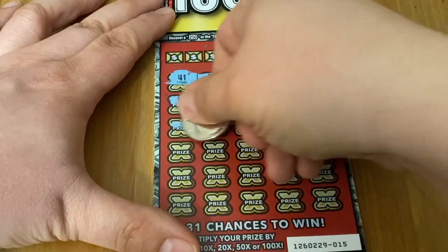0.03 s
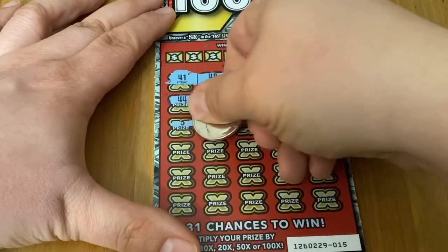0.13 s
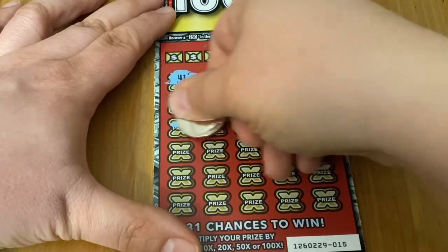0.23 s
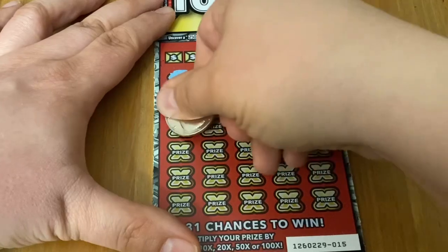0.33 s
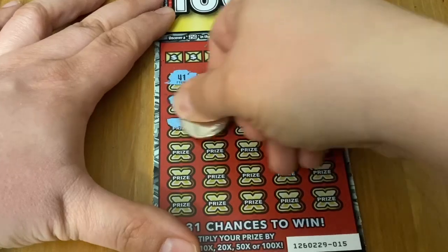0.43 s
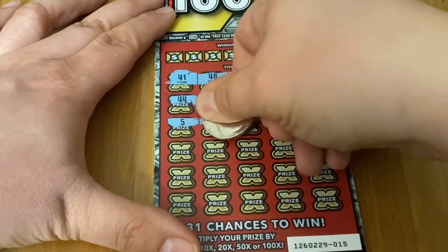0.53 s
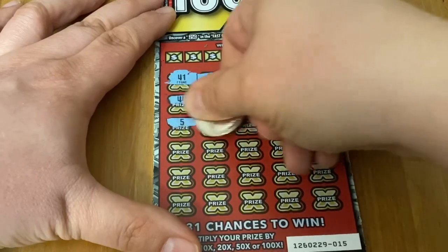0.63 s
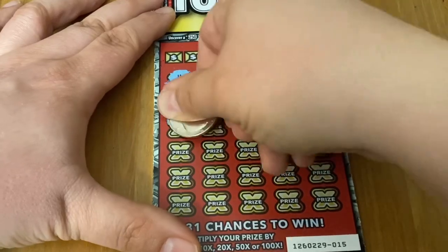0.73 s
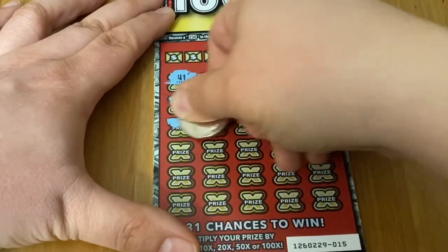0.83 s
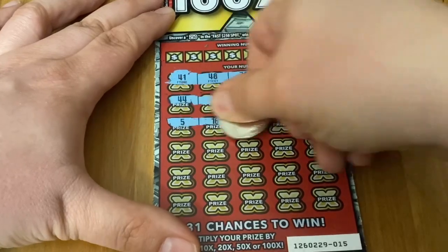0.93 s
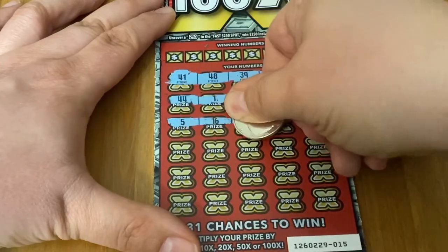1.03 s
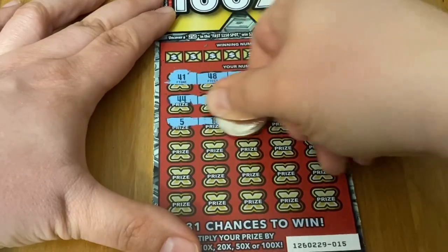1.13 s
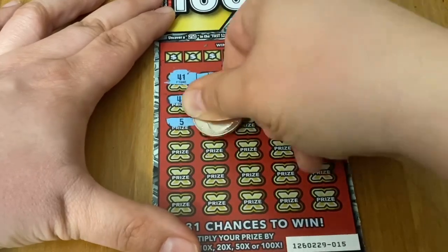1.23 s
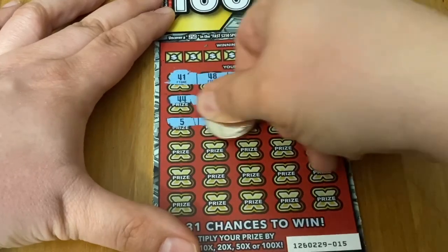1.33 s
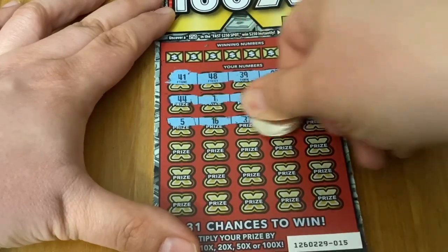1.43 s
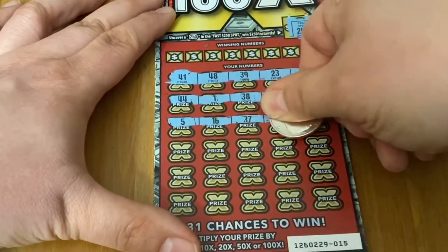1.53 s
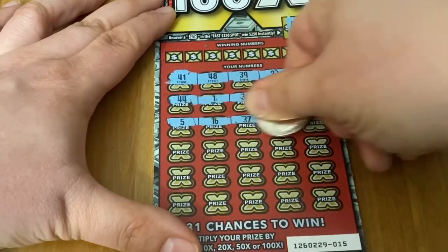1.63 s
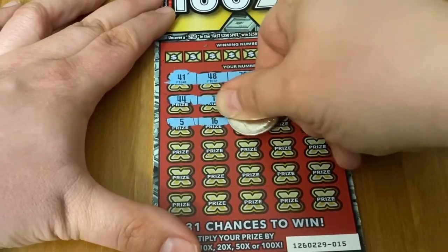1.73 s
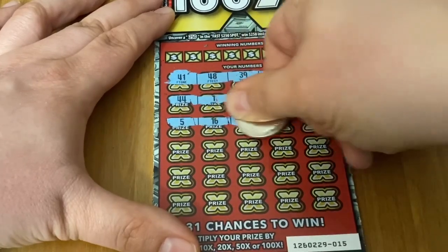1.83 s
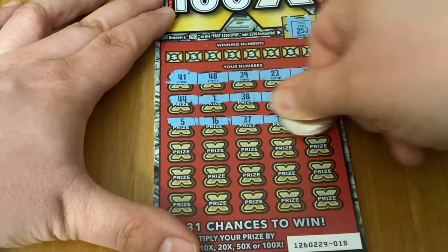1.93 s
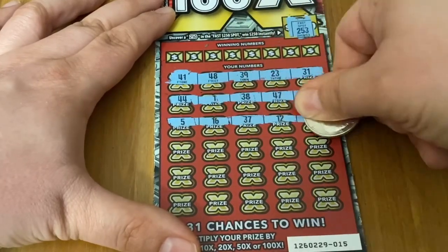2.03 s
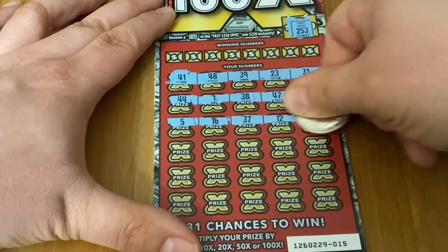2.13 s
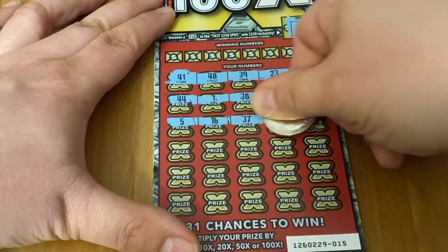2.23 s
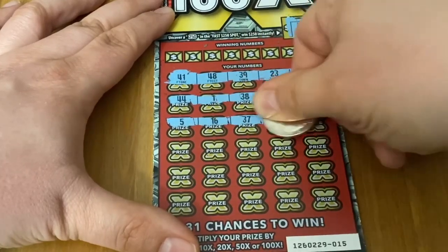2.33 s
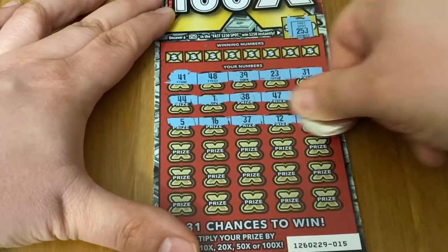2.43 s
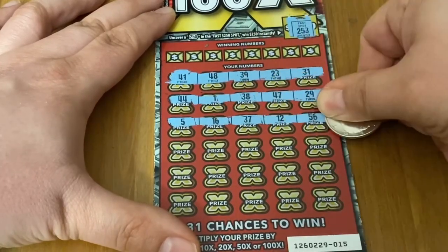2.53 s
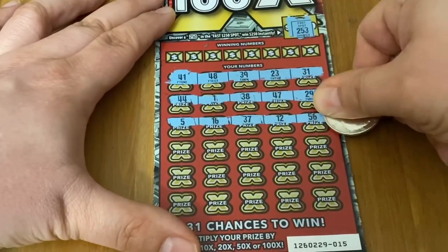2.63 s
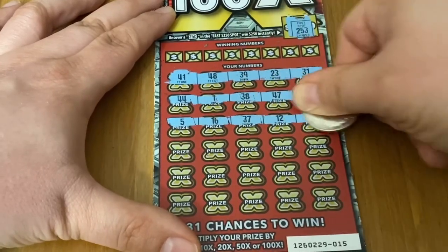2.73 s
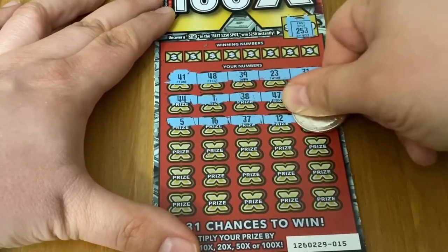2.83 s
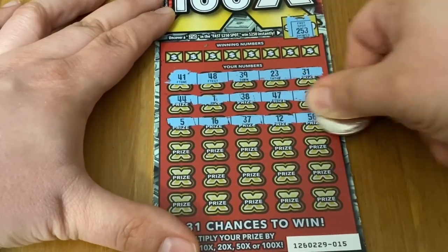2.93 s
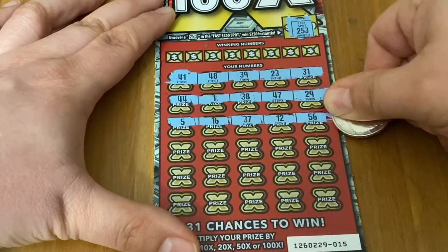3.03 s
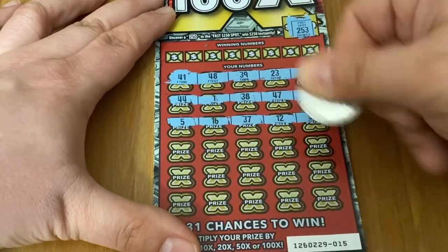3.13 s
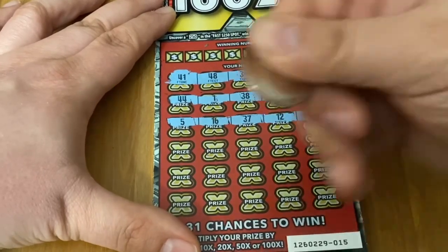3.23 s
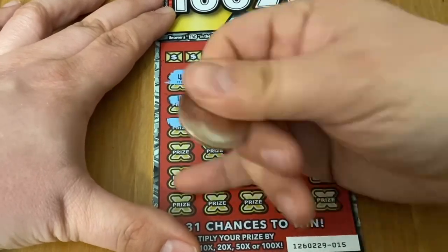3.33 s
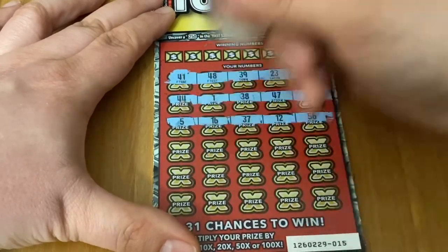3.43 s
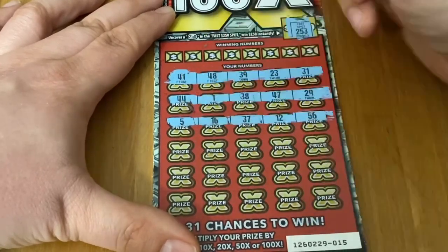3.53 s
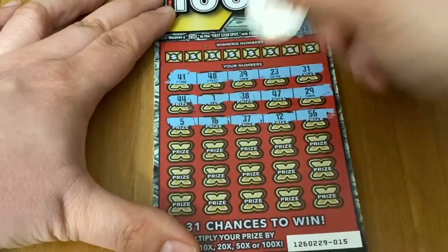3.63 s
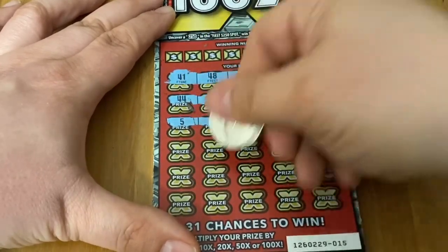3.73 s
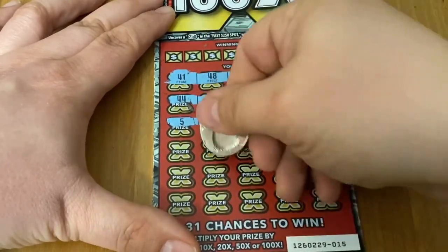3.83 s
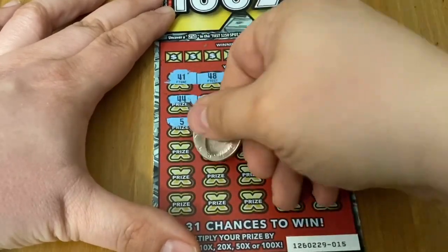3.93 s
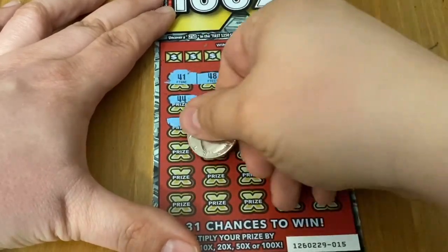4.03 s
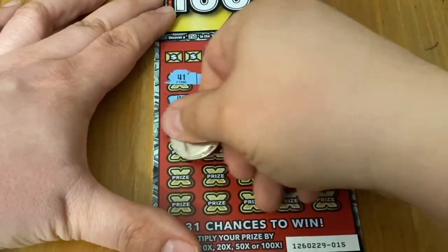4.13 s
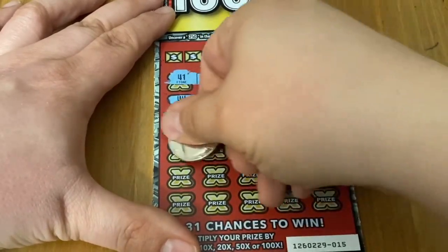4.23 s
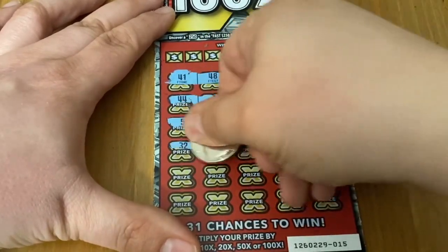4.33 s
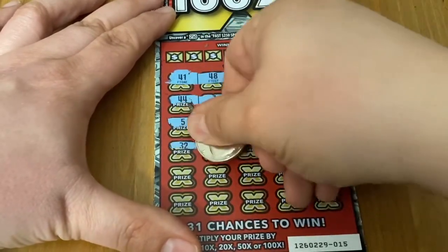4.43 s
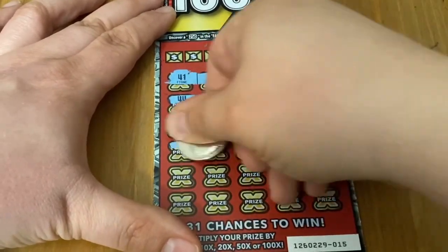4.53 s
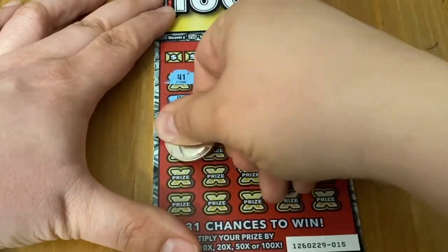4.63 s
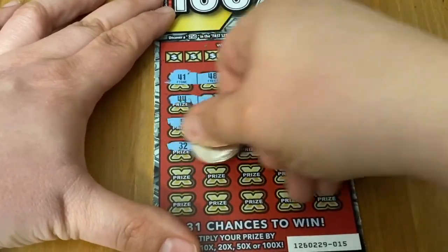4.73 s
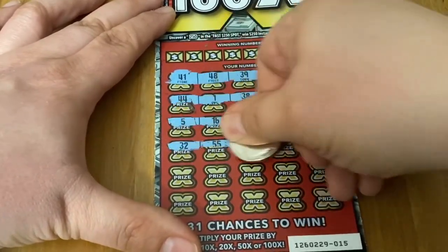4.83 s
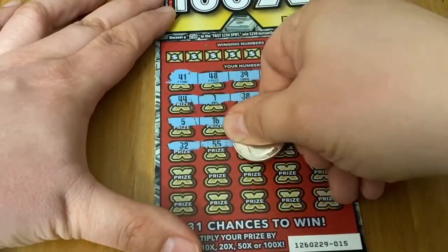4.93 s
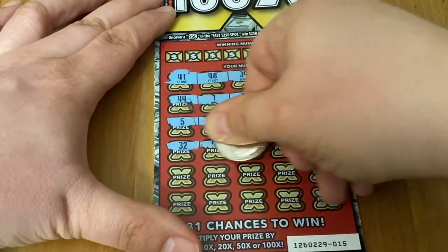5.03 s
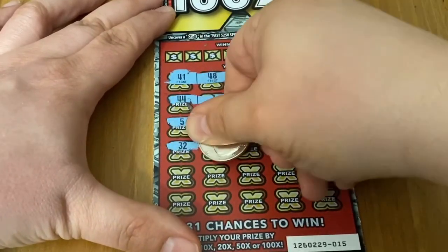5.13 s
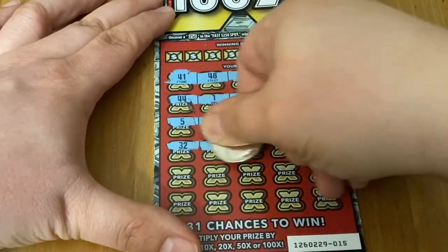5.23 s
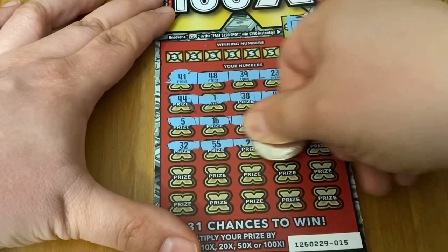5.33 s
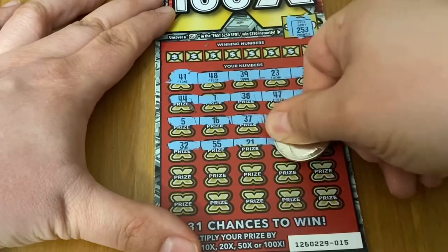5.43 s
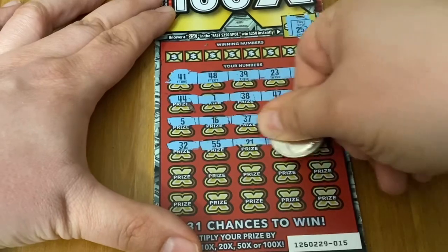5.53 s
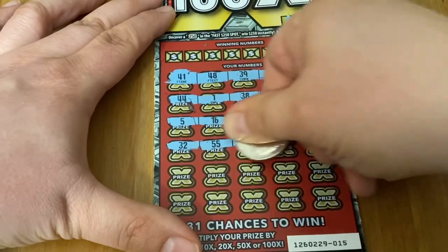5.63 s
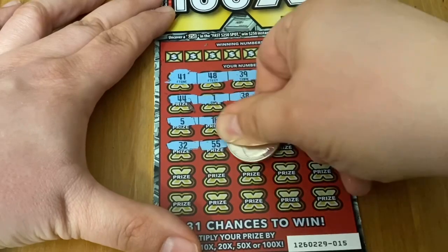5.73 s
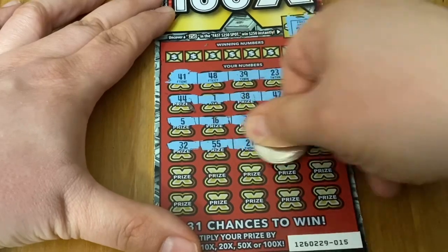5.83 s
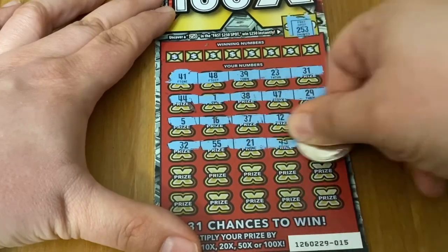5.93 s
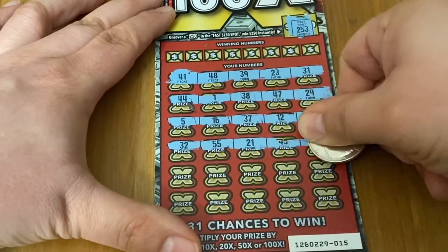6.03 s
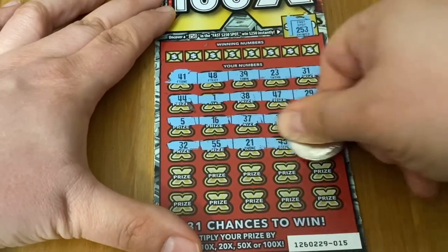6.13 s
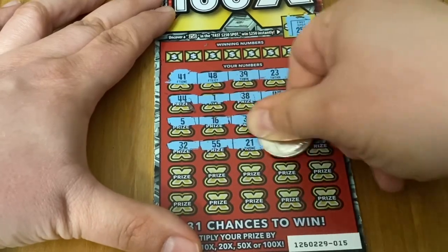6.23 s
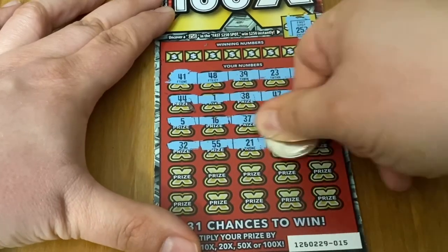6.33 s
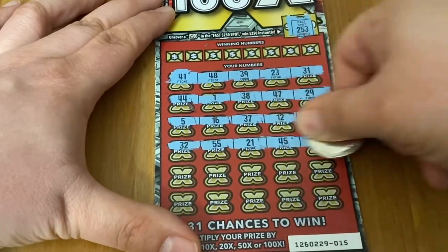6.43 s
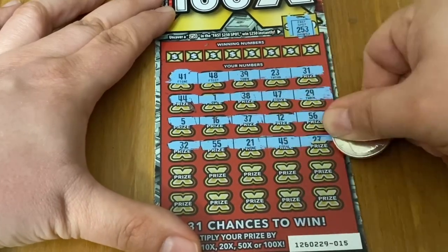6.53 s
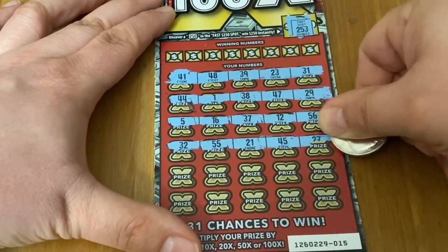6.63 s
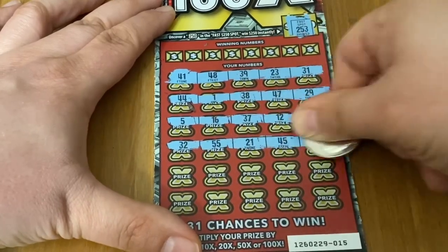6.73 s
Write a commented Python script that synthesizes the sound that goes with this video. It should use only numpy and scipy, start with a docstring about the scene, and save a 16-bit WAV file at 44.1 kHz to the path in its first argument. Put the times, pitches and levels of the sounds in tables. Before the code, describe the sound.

Close up in a small, quiet room, a coin is already scraping the coating from a paper ticket on a wooden table. From 0 to 3 seconds, gritty biting pushes come roughly every half second, peaking near 0.4, 0.9, 1.4, 1.9, 2.4 and 2.9, with lighter, thinner return strokes between them. Each is a dense midrange rasp with bright hiss, over a low stick-slip rumble of the table. Sharp little snaps stand out around 1.4 and 1.85. At about 3.3 the fingers swish over the paper and the hand thuds on the table; small ticks and faint rubs follow in near silence. At 3.9 the coin clacks down lightly and slides. From 4.0 scraping resumes, pushes peaking near 4.3, 4.75, 5.3, 5.85 and 6.4, with softer returns, the last fading near 6.8. Faint low room tone throughout.

```python
"""A coin scrapes the coating off a paper ticket on a wooden table, close to the microphone in a small room.
Biting pushes alternate with lighter returns: dense random clicks ring coin and card as flakes snap off,
while stick-slip pulses of the dragging coin shake the modes of the table top.
Between two rows the fingers sweep the card, the hand bumps the table and the coin is set down, sliding faintly.
Small snaps and bursts of flakes stand out of the strokes; a faint room tone with two drones lies beneath."""
import sys
import numpy as np
from scipy import signal
from scipy.fft import rfft, irfft
from scipy.io import wavfile
from scipy.ndimage import uniform_filter1d

SR = 44100
rng = np.random.default_rng(int(sys.argv[2]) if len(sys.argv) > 2 else 0)


def generate_wav(signal):
    """Clip the signal to [-1, 1] and save it as 16-bit WAV at the path in sys.argv[1]."""
    frames = np.transpose(np.atleast_2d(signal))
    scaled = np.clip(frames, -1, 1) * 32767
    pcm = np.round(scaled).astype(np.int16)
    wavfile.write(sys.argv[1], SR, pcm)


N = 298998
TIME = np.arange(N) / SR
FREQS = np.fft.rfftfreq(8192, 1 / SR)

# Broad colour of a biting push. Each row: frequency in Hz, relative level in dB.
PUSH_COLOUR = [(200, -7.5), (400, 1), (600, 1.5), (1000, 2.5), (1400, 2.5), (2000, 0), (3100, -0.5),
               (3900, -3.5), (4600, -26), (6000, -32.5), (9000, -23.5)]
# Broad colour of a lighter return. Each row: frequency in Hz, relative level in dB.
RETURN_COLOUR = [(200, -21), (400, 1), (600, 7.5), (1000, 5), (1400, 4), (2000, -4.5), (3100, -7),
                 (3900, -9), (4600, -7.5), (6000, -17), (9000, -34.5)]
# Bright hiss of the coin's edge. Each row: frequency in Hz, relative level in dB.
EDGE_COLOUR = [(2500, -44), (4000, -0.5), (5000, 5), (6300, 0), (7500, 0.5), (9000, -9), (11500, -3),
               (14000, -9.5), (15800, -8.5)]
# Resonances of coin and card pressed on the wood. Each row: centre in Hz, width in Hz, lift in dB.
CONTACT = [(723, 51, 8.5), (872, 11, 5), (992.4, 74, 10.5), (1220, 270, 7.5), (1770, 163, 7.5),
           (2080, 40, -1), (2240, 123, 9), (2478, 107, 7), (2906, 196, 11.5), (3220, 180, 4.5),
           (4990, 46, 2.5), (7560, 930, 4.5)]


def undb(db):
    """Decibels to gain."""
    return 10 ** (np.asarray(db) / 20)


def unit(x):
    """Scale to rms 1."""
    return x / np.sqrt(np.mean(x ** 2))


def ring(x, response):
    """Pass a signal through an impulse response."""
    return signal.oaconvolve(x, response)[:N]


def bandpass(low_hz, high_hz, order):
    """Filter sections that keep one band."""
    return signal.butter(order, [low_hz, high_hz], "bandpass", fs=SR, output="sos")


def highpass(hz, order):
    """Filter sections that remove the bass."""
    return signal.butter(order, hz, "highpass", fs=SR, output="sos")


def colour(points, resonances=()):
    """Causal response with a broad (Hz, dB) shape and narrow lifts on it."""
    hz, db = np.transpose(points)
    shape = np.interp(np.log(FREQS + 1), np.log(hz), db)
    for centre, width, lift in resonances:
        shape = shape + lift / (1 + (2 * (FREQS - centre) / width) ** 2)
    # folding the cepstrum forward in time gives minimum phase
    cepstrum = irfft(np.log(undb(shape)))
    half = len(cepstrum) // 2
    cepstrum[1:half] *= 2
    cepstrum[half + 1:] = 0
    return irfft(np.exp(rfft(cepstrum)))


def wander(rate):
    """Smooth chance of rms 1, drawing this many new values a second."""
    steps = rng.standard_normal(N)
    return unit(np.interp(TIME * rate, np.arange(N), steps))


def flakes(rate, spread_db):
    """Random clicks, many small and a few large; a negative spread makes a few small among many large."""
    hit = rng.random(N) < rate / SR
    size = undb(spread_db * np.minimum(rng.exponential(size=N), 5))
    sign = rng.choice([-1, 1], N)
    return unit(hit * size * sign)


def swell(moves, column, sink_db, arch):
    """Each move of the hand speeds up and slows down; its level arches over the fastest moment."""
    turn_s = 0.013  # the hand takes this long to start or stop
    gain = np.zeros(N)
    for move in moves:
        start, fastest, end = move[:3]
        during = slice(*np.searchsorted(TIME, [start, end]))
        t = TIME[during]
        slowness = np.interp(t, [start, fastest, end], [1, 0, 1])
        moving = np.minimum(np.minimum(t - start, end - t) / turn_s, 1)
        # arch 1 is a pointed swell, 2 a round one, more a flat one
        gain[during] += moving * undb(move[column] - sink_db * slowness ** arch)
    return gain


def room_tone():
    """Steady noise of the room, shaped broadly and lifted at two faint drones."""
    # Broad shape of the room tone. Each row: frequency in Hz, relative level in dB.
    tone = [(25, -14.5), (45, -4), (70, -2), (115, 2.5), (160, -14.5), (210, -4.5), (330, -22), (550, -25),
            (800, -33), (1200, -37.5), (2500, -44.5), (6000, -49), (15500, -52.5)]
    # Faint drones in it. Each row: centre in Hz, width in Hz, lift in dB.
    drones = [(336, 20, 16), (489, 60, 9)]
    return undb(-55) * unit(ring(rng.standard_normal(N), colour(tone, drones)))


def table_top(column):
    """Response of the wood as a sum of dying modes; the column says how it is driven."""
    # Modes of the table top. Each row: frequency in Hz, 60 dB decay time in seconds,
    # then relative level in dB under a push, under a return and under a blow.
    modes = [(64.6, 0.14, -11, -17, -28), (85.8, 0.25, 1.5, 10.5, -4), (108.25, 0.19, 11.5, 6, 4),
             (119.7, 0.37, 6, 1, -24), (180.2, 0.17, 8.5, 7.5, 1), (206.4, 0.25, 2.5, -8, -4),
             (225, 0.074, -3, -36, -8), (312, 0.027, -10, -15, -10), (497, 0.064, -56, -54, -12),
             (764, 0.083, -30, -60, -21), (970, 0.028, -32, -24, -11)]
    t = TIME[:SR // 2]
    response = np.zeros(len(t))
    for mode in modes:
        hz, t60_s = mode[:2]
        decay = np.exp(-np.log(1000) * t / t60_s)
        response += undb(mode[column]) * np.sin(2 * np.pi * hz * t) * decay
    return response


def table_shake(strokes, table, slip_hz, soft_hz, judder_db, jitter):
    """The coin sticks and slips, partly in a judder and partly at random; the card cushions each slip."""
    _, fastest, *_, judder_hz = np.transpose(strokes)
    # strokes change over midway between their fastest moments
    stroke = np.searchsorted((fastest[1:] + fastest[:-1]) / 2, TIME)
    cycles = np.cumsum(judder_hz[stroke] * np.exp(jitter * wander(rate=60))) / SR
    judder = unit(np.diff(np.floor(cycles), prepend=0))  # one pulse a cycle
    slips = flakes(slip_hz, spread_db=4) + undb(judder_db) * judder
    cushioned = signal.sosfilt(bandpass(45, soft_hz, order=4), slips)
    shake = unit(ring(cushioned, table))
    # the pressing hand keeps the swing of the table in step with the stroke
    shake = shake / np.sqrt(uniform_filter1d(shake ** 2, size=1700) + 1e-6)
    # the board is too small to radiate the deepest bass
    return unit(signal.sosfilt(highpass(58, order=4), shake))


def hand_echo(x, lag_s, travel, echo_db):
    """The cupped hand reflects the scrape; its wandering distance moves the colour."""
    lag = lag_s * np.exp(travel * wander(rate=5))
    reflection = np.interp(TIME - lag, TIME, x)
    return unit(x + undb(echo_db) * reflection)


def snags():
    """Gain on the table's shake: it swells briefly wherever the coin snags and jolts the table."""
    # Snags of the coin. Each row: time in seconds, extra shake in dB.
    jolts = [(0.062, 8.5), (0.25, 9), (0.445, 6.5), (0.68, 4), (1.085, 4.5), (1.365, 3), (1.615, 1),
             (1.84, 11.5), (2.173, 11), (2.359, 8.5), (2.924, 8), (5.259, 9), (6.17, 9.5), (6.44, 4.5)]
    snag_s = 0.025  # a snag builds and lets go in about this time
    lift = np.zeros(N)
    for s, db in jolts:
        near = slice(*np.searchsorted(TIME, [s - 2 * snag_s, s + 2 * snag_s]))
        lift[near] += db * np.exp(-((TIME[near] - s) / snag_s) ** 2)
    return undb(lift)


def scrape(strokes, sink_db, arch, body, shake, flake_hz, spread_db, crumb_hz, crumb_spread_db,
           patchy_db, scrape_db, edge_db, shake_db):
    """Flakes snap off in clicks that ring coin and card; table bounce and uneven coating vary the bite."""
    bite = undb(1.3 * shake + 1.1 * wander(rate=160))
    clicks = flakes(flake_hz, spread_db)
    crumbs = clicks + flakes(crumb_hz, crumb_spread_db)  # the finest crumbs sound only in the treble
    cupped_clicks = hand_echo(clicks * bite, lag_s=0.00075, travel=0.35, echo_db=-11.5)
    cupped_crumbs = hand_echo(crumbs * bite, lag_s=0.000772, travel=0.12, echo_db=-3.5)
    rasp = unit(ring(cupped_clicks, colour(body, CONTACT)))
    edge = unit(ring(cupped_crumbs, colour(EDGE_COLOUR, CONTACT)))

    effort = swell(strokes, column=3, sink_db=sink_db[0], arch=arch)
    hiss = swell(strokes, column=4, sink_db=sink_db[1], arch=arch)
    drag = swell(strokes, column=5, sink_db=sink_db[2], arch=arch) * snags()
    grip = undb(patchy_db * wander(rate=45))  # the rim crosses coated and bare patches
    layers = undb(scrape_db) * effort * rasp
    layers += undb(edge_db) * hiss * edge
    layers += undb(shake_db) * drag * shake
    return grip * layers


def pushes():
    """Biting strokes: a strong rasp and edge hiss over the table's judder."""
    # Each row: start, fastest moment and end in seconds, then relative levels in dB
    # of scrape, edge hiss and table shake, then the centre of the judder in Hz.
    strokes = [(-0.1, -0.01, 0.11, -41, -51.5, -36, 118.9), (0.27, 0.441, 0.54, -45.5, -53.5, -38.5, 189),
               (0.72, 0.908, 1.008, -43.5, -49, -32.5, 96), (1.225, 1.389, 1.532, -40.5, -44.5, -31, 180.8),
               (1.725, 1.903, 2.06, -42.5, -52.5, -32.5, 120.8),
               (2.25, 2.426, 2.56, -43.5, -52.5, -31.5, 115), (2.775, 2.932, 3.033, -50, -59, -31.5, 107),
               (4.14, 4.284, 4.424, -45, -57, -38, 182), (4.585, 4.744, 4.9, -41, -49.5, -33.5, 95.77),
               (5.135, 5.313, 5.458, -42, -50.5, -32.5, 180), (5.66, 5.856, 6.033, -41, -50, -35, 112.8),
               (6.22, 6.385, 6.58, -41, -51, -34, 123.1)]
    # How far scrape, edge hiss and table shake sink from mid-stroke to the turn, in dB.
    sink_db = (41, 50, 24)
    shake = table_shake(strokes, table_top(column=2), slip_hz=888, soft_hz=306, judder_db=-3.5, jitter=0.11)
    return scrape(strokes, sink_db, 1.776, PUSH_COLOUR, shake, flake_hz=9010, spread_db=1.5,
                  crumb_hz=2990, crumb_spread_db=2.5, patchy_db=0.87,
                  scrape_db=0.5, edge_db=0, shake_db=-1)


def returns_and_slide():
    """Lighter strokes back, and at 3.87 s the set-down coin's faint slide: denser flakes, a patchier grip."""
    # Strokes back and the one slide. Each row: start, fastest moment and end in seconds, then relative
    # levels in dB of scrape, edge hiss and table shake, then the centre of the judder in Hz.
    strokes = [(0.106, 0.186, 0.32, -50, -57.5, -38.5, 88.1), (0.55, 0.604, 0.75, -54.5, -62, -35, 110.3),
               (0.98, 1.129, 1.242, -52.5, -60.5, -31, 78.1), (1.537, 1.618, 1.748, -50, -56.5, -28, 119),
               (2.05, 2.135, 2.284, -51, -58.5, -33.5, 107.9), (2.58, 2.703, 2.81, -52, -61, -32, 67),
               (3.87, 3.98, 4.35, -62.5, -76, -55.5, 105.1), (4.015, 4.082, 4.16, -47.5, -59, -36, 199),
               (4.33, 4.539, 4.609, -53, -60, -35, 103.9), (4.9, 5.003, 5.17, -49.5, -60.5, -34, 74.98),
               (5.47, 5.574, 5.69, -47.5, -56.5, -29, 102), (6.021, 6.09, 6.275, -52.5, -60.5, -36, 108),
               (6.56, 6.671, 6.8, -51.5, -64, -33.5, 78.9)]
    # How far scrape, edge hiss and table shake sink from mid-stroke to the turn, in dB.
    sink_db = (34.5, 46, 23.5)
    shake = table_shake(strokes, table_top(column=3), slip_hz=645, soft_hz=265, judder_db=-1, jitter=0.07)
    return scrape(strokes, sink_db, 1.935, RETURN_COLOUR, shake, flake_hz=13600, spread_db=3,
                  crumb_hz=4500, crumb_spread_db=-12, patchy_db=2.2,
                  scrape_db=0.44, edge_db=0.8, shake_db=0.04)


def bites(decay_s, edge_db):
    """The rim digs into fresh coating and a patch gives way at once: a sudden burst of flakes."""
    # Each row: time in seconds, relative level in dB.
    digs = [(0.581, -54), (0.865, -38.5), (1.13, -57), (1.37, -44), (1.569, -52.5), (1.884, -38.5),
            (3.039, -62), (4.036, -53), (4.213, -55.5), (4.644, -52.5), (5.254, -43), (5.723, -59),
            (6.279, -55)]
    burst = np.zeros(N)
    for s, db in digs:
        burst += undb(db) * (TIME >= s) * np.exp(-np.abs(TIME - s) / decay_s)
    clicks = flakes(rate=8300, spread_db=-2.5)
    body = unit(ring(clicks, colour(PUSH_COLOUR, CONTACT)))
    edge = unit(ring(clicks, colour(EDGE_COLOUR)))
    return burst * (body + undb(edge_db) * edge)


def ticks(decay_s, level_db):
    """The rim or a nail catches on the card: short dry snaps of fast-dying noise."""
    # Each row: start in seconds, relative level in dB.
    catches = [(0.6909, -37), (0.8633, -38), (1.19, -44.5), (1.3679, -32), (1.8408, -30.5), (1.8801, -29),
               (2.528, -55), (2.8894, -37.5), (3.22, -45.5), (3.2767, -26), (3.4532, -36), (3.5034, -51),
               (3.523, -47), (3.683, -58), (3.8806, -37), (4.136, -47.5), (5.2534, -39), (6.0121, -56),
               (6.494, -44)]
    # Colour of a snap. Each row: frequency in Hz, relative level in dB.
    snap_colour = [(300, 9), (2000, -9.5), (4500, -2), (8000, -1.5), (12000, -6), (15500, -10.5)]
    out, t = np.zeros(N), TIME[:SR // 20]
    for s, db in catches:
        crack = rng.standard_normal(len(t)) * np.exp(-t / decay_s)
        snap = ring(crack, colour(snap_colour))[:len(t)]
        start = int(s * SR)
        out[start:start + len(t)] += undb(db + level_db) * snap / np.abs(snap).max()
    return out


def rub(moves, body, grain_hz, spread_db, sink_db, arch, level_db):
    """Light sliding: a fine random grain with no weight behind it."""
    gain = undb(level_db) * swell(moves, column=3, sink_db=sink_db, arch=arch)
    return gain * unit(ring(flakes(grain_hz, spread_db), colour(body)))


def sweeps():
    """Fingers sweep over the paper: a fine, bright grain of sliding skin."""
    # Each row: start, fastest moment and end in seconds, relative level in dB.
    moves = [(3.21, 3.272, 3.3, -59.5), (3.29, 3.37, 3.46, -43), (3.49, 3.544, 3.625, -66.5)]
    # Each row: frequency in Hz, relative level in dB.
    body = [(400, -7), (1500, -9.5), (3000, -6.5), (5000, -5), (8000, -1.5), (11000, 0.5), (15500, 0.5)]
    return rub(moves, body, grain_hz=11100, spread_db=3, sink_db=30, arch=1.53, level_db=1.5)


def blows(clack_s):
    """The soft hand drives the table's low modes; the hard rim clacks on the card and drives higher ones."""
    # Blows by the hand and then the coin's rim. Each row: start in seconds, relative thud level in dB,
    # lowest and highest frequency driven in Hz, relative clack level in dB.
    impacts = [(3.284, -18, 89, 313, -45.5), (3.883, -29.5, 262, 1040, -33)]
    out, t = np.zeros(N), TIME[:SR // 2]
    for s, thud_db, low_hz, high_hz, clack_db in impacts:
        band = bandpass(low_hz, high_hz, order=2)
        thud = signal.sosfilt(band, table_top(column=4))
        crack = rng.standard_normal(len(t)) * np.exp(-t / clack_s)
        clack = signal.sosfilt(band, ring(crack, colour(RETURN_COLOUR, CONTACT)))[:len(t)]
        start = int(s * SR)
        out[start:start + len(t)] += undb(thud_db) * thud / np.abs(thud).max()
        out[start:start + len(t)] += undb(clack_db) * clack / np.abs(clack).max()
    return out


def regrip():
    """The coin turns between the fingers: two small rubs."""
    # Each row: start, fastest moment and end in seconds, relative level in dB.
    moves = [(3.664, 3.688, 3.746, -62.5), (3.77, 3.806, 3.85, -70.5)]
    # Each row: frequency in Hz, relative level in dB.
    body = [(1000, -25), (2500, -6), (4800, 9), (7000, 2.5), (10000, -6), (15500, -11)]
    return rub(moves, body, grain_hz=5000, spread_db=4, sink_db=21, arch=1.1, level_db=0)


def dragging_fingers():
    """Fingers drag lightly over the card as the hand moves along: one dense, even rub."""
    # Each row: start, fastest moment and end in seconds, relative level in dB.
    moves = [(4.76, 5.08, 5.3, -62.5)]
    # Each row: frequency in Hz, relative level in dB.
    body = [(1000, 6), (4500, -1.5), (7000, -6.5), (11500, -6), (14500, -1.5), (15800, -6)]
    return rub(moves, body, grain_hz=15190, spread_db=-6, sink_db=13, arch=3.3, level_db=1)


def room(x, dull_hz):
    """A short diffuse tail of decaying noise, dulled in the treble."""
    t60_s, gap_s = 0.23, 0.003
    t = TIME[:SR // 2]
    tail = rng.standard_normal(len(t)) * np.exp(-np.log(1000) * t / t60_s) * (t > gap_s)
    tail = tail / np.sqrt(np.sum(tail ** 2))
    return ring(x, signal.sosfilt(signal.butter(1, dull_hz, fs=SR, output="sos"), tail))


def scene():
    """All sources sit near the middle; only the room's lower midrange is wide."""
    scraping = pushes() + returns_and_slide()
    hits = blows(clack_s=0.006) + bites(decay_s=0.02, edge_db=-7) + ticks(decay_s=0.0025, level_db=-4)
    fingers = sweeps() + regrip() + dragging_fingers()
    near = scraping + hits + fingers
    floor = room_tone()

    airborne = signal.sosfilt(highpass(350, order=2), near)
    mid = near + undb(-9) * room(airborne, dull_hz=4760) + floor
    wide = signal.sosfilt(bandpass(240, 1500, order=3), near + floor)
    side = undb(-4.5) * room(wide, dull_hz=1650)
    balance = undb(np.array([[0.2], [-0.2]]))  # a touch more on the left
    return np.array([mid + side, mid - side]) * balance


def record(dry):
    """The two microphone ports differ in phase around a few frequencies; the top is cut."""
    # The left port lags by one whole turn around each of these. Each row: centre in Hz, width in Hz.
    port_turns = [(1280, 310), (9080, 1300), (13300, 1380)]
    top_hz = 15850
    hz = np.fft.rfftfreq(N, 1 / SR)
    lag = sum(np.pi * (1 + np.tanh((hz - centre) / width)) for centre, width in port_turns)
    left = irfft(rfft(dry[0]) * np.exp(-1j * lag), N)
    top_cut = signal.ellip(10, 0.2, 70, top_hz, fs=SR, output="sos")
    return signal.sosfilt(top_cut, np.array([left, dry[1]]))


dry = scene()
out = record(dry)
generate_wav(out)
```